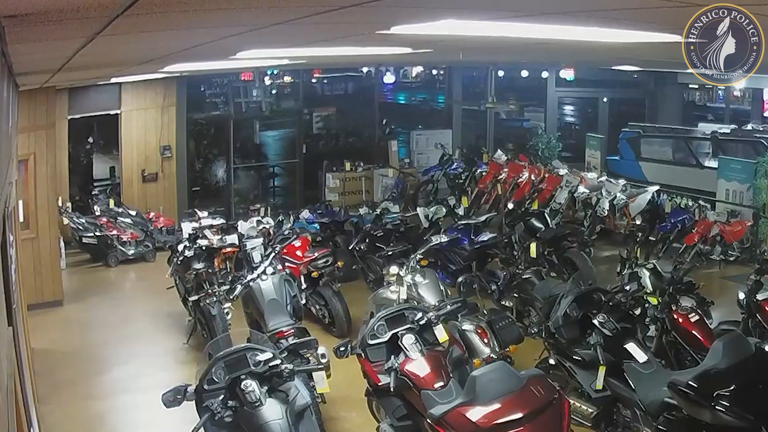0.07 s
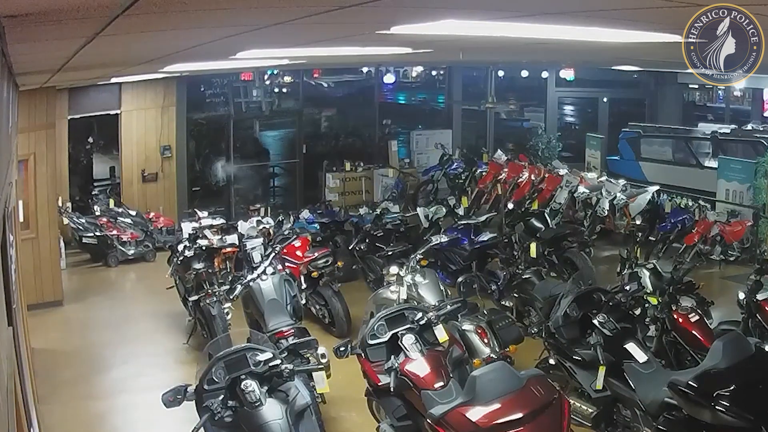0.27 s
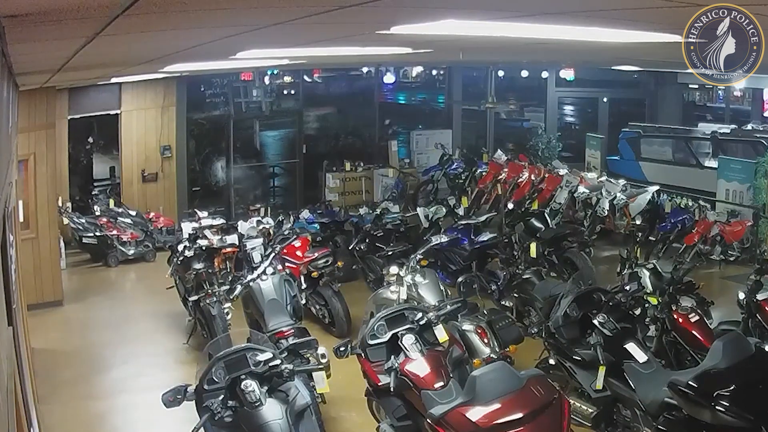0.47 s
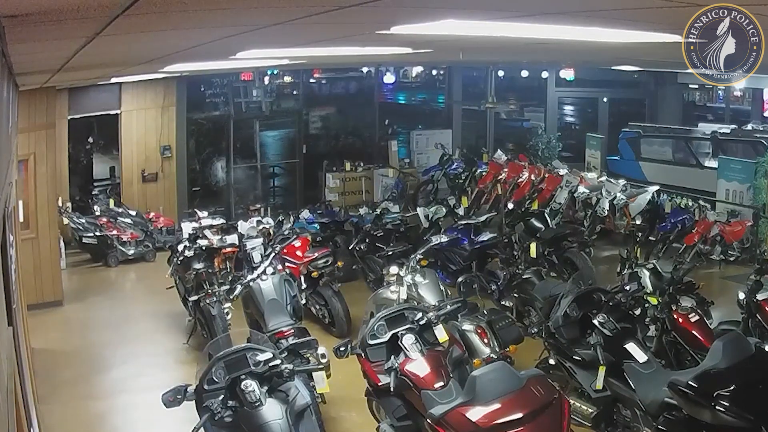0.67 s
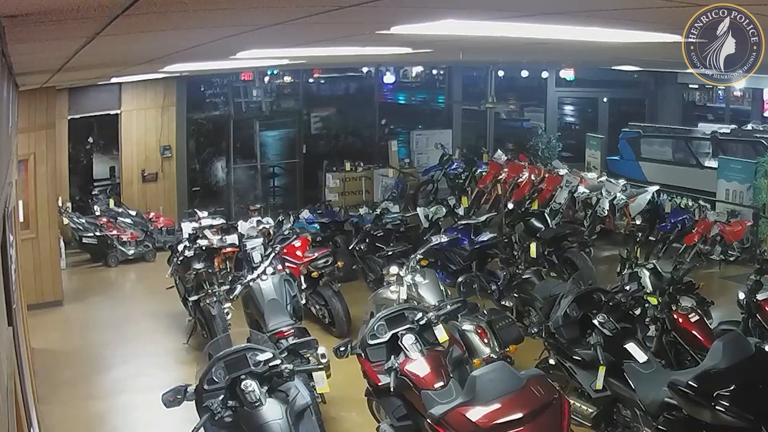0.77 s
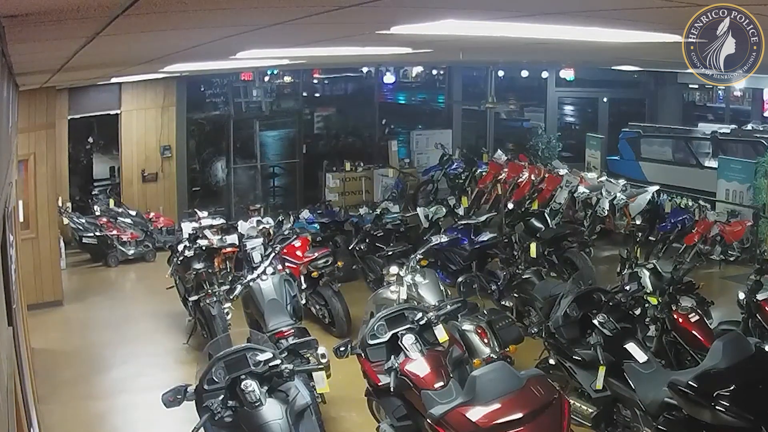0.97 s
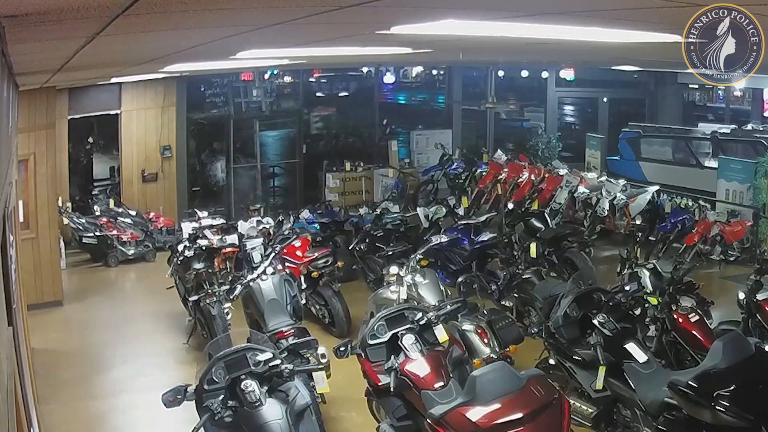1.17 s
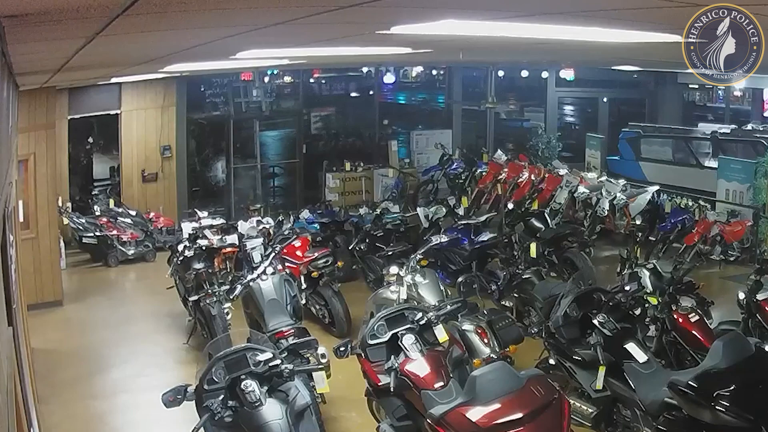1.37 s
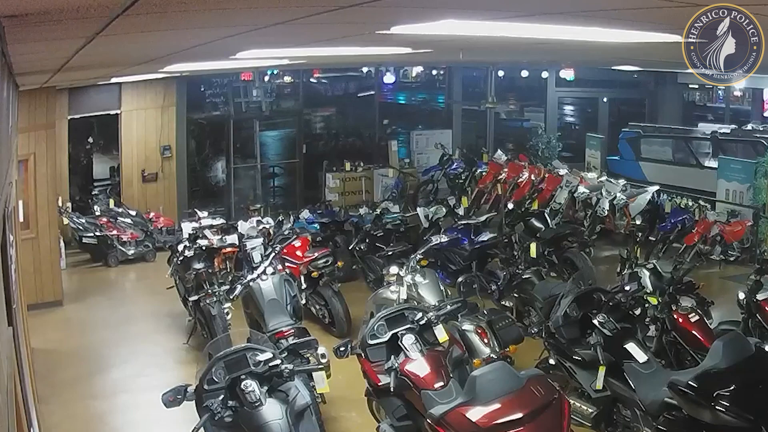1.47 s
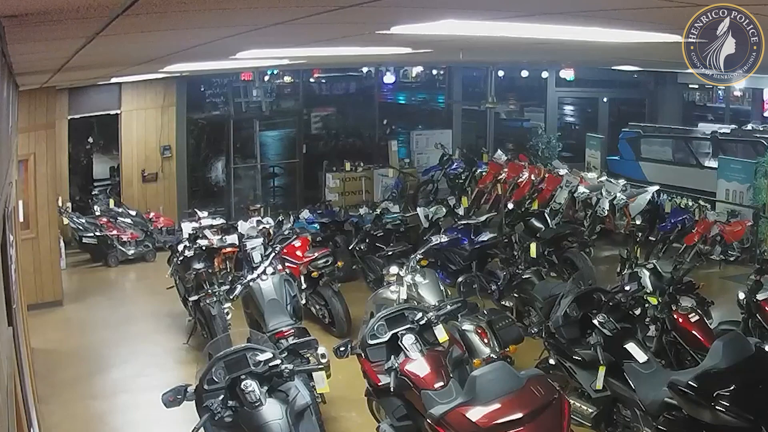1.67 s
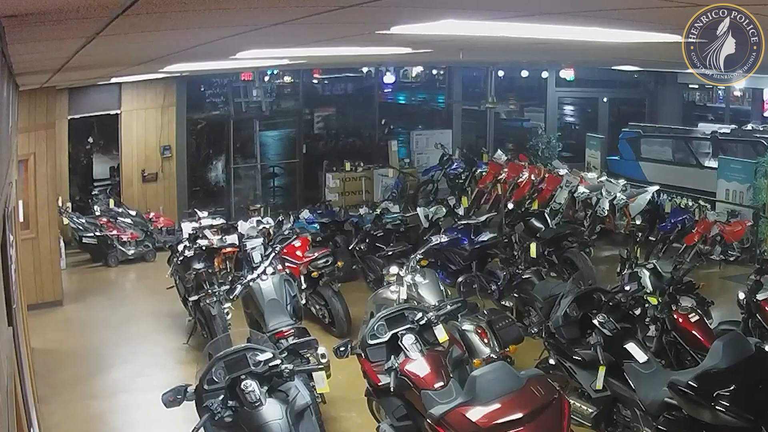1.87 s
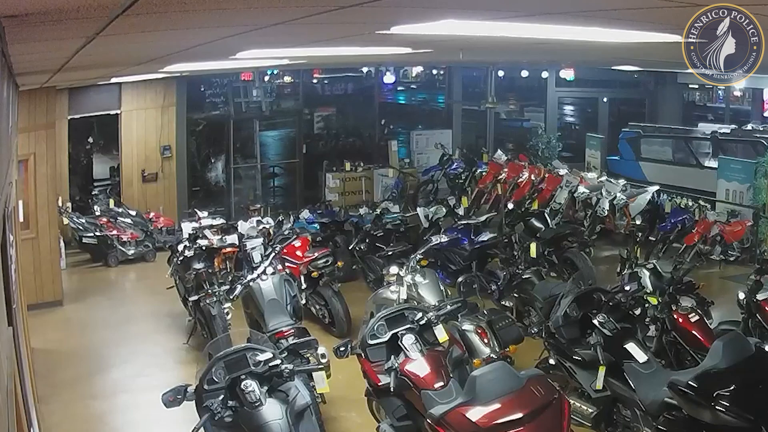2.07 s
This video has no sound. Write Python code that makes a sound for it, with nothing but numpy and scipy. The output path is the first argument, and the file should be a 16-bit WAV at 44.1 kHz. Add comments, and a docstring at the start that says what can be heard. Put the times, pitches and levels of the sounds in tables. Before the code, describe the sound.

A glass door bursts under a heavy blow, then shards tinkle down in a large showroom

```python
"""Glass door bursting in a showroom

A heavy blow bursts a glass door: the frame rings as damped modes and the pane crashes down as filtered noise.
Shards fall as random damped tones and clink on the floor, with two short low squeaks of paired gliding
tones and some dull bumps of low noise. A diffuse tail gives the large room; a small security-camera
microphone with a sharp resonance hears it from across the room and overloads on the crash."""
import sys
import numpy as np
from scipy import signal
from scipy.fft import rfft, irfft, next_fast_len
from scipy.io import wavfile
from scipy.ndimage import uniform_filter1d

SR = 44100
rng = np.random.default_rng(int(sys.argv[2]) if len(sys.argv) > 2 else 0)


def generate_wav(sig):
    """Save sig (samples, or channels by samples) to the path in sys.argv[1] as 16-bit PCM at SR."""
    pcm = np.round(np.clip(np.atleast_2d(sig).T, -1, 1) * 32767).astype(np.int16)
    wavfile.write(sys.argv[1], SR, pcm)


N = 94815
TOP_HZ = 7280  # upper band limit of the microphone, shards and room tail

# Crack and thud onsets: a soft lead-in, the heavy blows that burst the pane, then later cracks among the
# falling glass. Each row: start in seconds, crack level in dB, thud level in dB.
ONSETS = [(0.203, -11, -24.5), (.216, 4, -17.5), (.236, -1, -14.5), (0.261, -5, -15), (0.293, -8, -27.5),
          (0.323, -13.5, -13.5), (.365, -32, -22.5), (0.461, -30, -28.5), (0.576, -30, -34),
          (.96, -32.5, -81), (1.259, -40, -75.5), (1.372, -28.5, -59.5), (1.479, -32.5, -59.5),
          (1.73, -29, -60), (2.14, -29, -72)]


def amp(db):
    """Level: a decibel value becomes a pressure gain."""
    return 10 ** (np.asarray(db) / 20)


def unit(x):
    """Normalisation: scale to an rms of 1."""
    return x / np.sqrt(np.mean(x ** 2) + 1e-20)


def along(points, hz):
    """Interpolation: read (Hz, value) points on a logarithmic frequency axis."""
    f, v = np.transpose(points)
    return np.interp(np.log(hz + 1), np.log(f + 1), v)


def colour(x, points):
    """Minimum-phase filtering: folding the cepstrum makes a (Hz, dB) response causal."""
    size = 8192
    cepstrum = irfft(np.log(amp(along(points, np.fft.rfftfreq(size, 1 / SR)))))
    cepstrum[1:size // 2] *= 2
    cepstrum[size // 2 + 1:] = 0
    impulse = irfft(np.exp(rfft(cepstrum)))
    return signal.fftconvolve(x, impulse)[:len(x)]


def noise(points):
    """Spectral shaping: white noise takes on a (Hz, dB) spectrum, at rms 1."""
    return unit(colour(rng.standard_normal(N), points))


def add(track, s, sound):
    """Superposition: mix a sound into the track from time s."""
    i = max(0, round(s * SR))
    part = sound[:max(0, N - i)]
    track[i:i + len(part)] += part


def hush():
    """Stationary background noise: the quiet room hum is mostly low-frequency."""
    # Each row: frequency in Hz, level in dB.
    hush_spectrum = [(20, 10.5), (50, 15), (120, -2.5), (300, 3.5), (1000, -0.5), (3000, -44),
                     (7300, -24.5)]
    return amp(-70) * noise(hush_spectrum)


def pings(per_s, centre_hz, spread, cycles, size, count):
    """Random impacts: damped tones of scattered time, pitch, strength and life sum to rms 1."""
    size_spread_db = 3.5
    start, pitch, strength, life = rng.random(count), *rng.standard_normal((3, count))
    falling = np.arange(count) < per_s * N / SR
    t = np.arange(size) / SR
    hz = np.clip(centre_hz * np.exp(spread * pitch), 150, TOP_HZ)[:, None]
    # each tone falls 60 dB in its own number of cycles; a taper brings the end to zero
    life_cycles = cycles * np.exp(life / 2)[:, None]
    fade = amp(-60 * hz * t / life_cycles) * (1 - t / t[-1])
    gain = falling * amp(size_spread_db * np.minimum(strength, 2))
    tones = gain[:, None] * np.sin(2 * np.pi * hz * t) * fade
    at = (start * N).astype(int)[:, None] + np.arange(size)
    return unit(np.bincount(at.ravel(), tones.ravel(), minlength=N)[:N])


def shower():
    """Granular impact: many small shards ping over a grit of splinters, with heavier pieces knocking."""
    # Flow of falling glass. Each row: time in seconds, level in dB.
    flow_points = [(0, -37), (.135, -45.5), (.155, -66.5), (.205, -56), (.225, 7), (.33, -9), (.455, -9.5),
                   (.5, -26.5), (.6, -21.5), (.69, -42.5), (.85, -33.5), (0.949, -40), (1.041, -33.5),
                   (1.098, -28), (1.161, -20), (1.23, -31), (1.33, -29.5), (1.399, -25.5), (1.45, -30),
                   (1.505, -24), (1.6, -31.5), (1.65, -26.5), (1.73, -14.5), (1.82, -14.5), (1.899, -29),
                   (2.0, -58), (2.039, -28), (2.07, -21.5), (2.111, -25.5), (2.15, -14.5)]
    # Spectrum of shards and splinters. Each row: frequency in Hz, level in dB.
    glass_spectrum = [(40, -48.5), (200, -26), (450, -25.5), (750, -14.5), (1500, 0), (2500, 6),
                      (4000, 4.5), (5500, -7.5), (7300, -13)]
    grit_db, chunk_db = -7, -16.5  # relative to the shards
    shards = pings(per_s=2700, centre_hz=3200, spread=0.2917, cycles=16, size=500, count=6000)
    shards = unit(colour(shards, glass_spectrum))
    chunks = pings(per_s=340, centre_hz=1296, spread=.4, cycles=27, size=2000, count=800)
    grit = noise(glass_spectrum)
    flow = amp(np.interp(np.arange(N) / SR, *np.transpose(flow_points)))
    return flow * unit(shards + amp(grit_db) * grit + amp(chunk_db) * chunks)


def rumble():
    """Forced vibration: the shaken door leaf radiates low noise that follows a level curve."""
    # Each row: time in seconds, level in dB.
    rumble_points = [(0, -62), (.2, -45), (.24, -40), (.6, -37), (.8, -43.5), (1.0, -48), (1.33, -49.5),
                     (1.43, -35), (1.6, -44.5), (1.69, -50.5), (1.8, -48.5), (1.92, -47), (2.02, -88.5),
                     (2.15, -69.5)]
    # Each row: frequency in Hz, level in dB.
    leaf_spectrum = [(20, -2), (45, -9.5), (90, -3.5), (140, -7.5), (300, -5.5), (450, -12), (1000, -14.5),
                     (2500, -36.5)]
    level_db = np.interp(np.arange(N) / SR, *np.transpose(rumble_points))
    return amp(level_db) * noise(leaf_spectrum)


def clinks():
    """Modal impact: each larger shard lands with four short damped modes of its own."""
    # Each row: landing time in seconds, peak level in dB before the room.
    landings = [(.064, -28), (.525, -8.5), (.545, -15), (1.1356, -17), (1.1722, -14), (1.2646, -14.5),
                (1.2908, -21.5), (1.3804, -34), (1.613, -25), (1.6671, -20.5), (1.6915, -26), (1.7125, -10),
                (1.78, -9), (1.801, -3), (1.822, -13.5), (1.87, -8.5), (1.893, -13), (1.911, -29),
                (1.9644, -18), (2.0615, -22), (2.081, -18), (2.093, -16), (2.1242, -44)]
    centre_hz, spread, t60_s, attack_s = 3134, 0.092, 0.016, 0.0013
    out, t = np.zeros(N), np.arange(SR // 10) / SR
    envelope = amp(-60 * t / t60_s) * (1 - np.exp(-t / attack_s))
    for s, db in landings:
        hz = centre_hz * np.exp(spread * rng.standard_normal(size=(4, 1)))
        modes = np.sin(2 * np.pi * (hz * t + rng.random(hz.shape)))
        ring = modes.sum(axis=0) * envelope
        add(out, s, amp(db) * ring / np.abs(ring).max())
    return out


def waver():
    """Random modulation: smoothed noise makes a quick drift of rms 1."""
    return unit(uniform_filter1d(rng.standard_normal(N), size=200))


def frame_ring(t):
    """Modal decay: the loose frame rings in damped modes whose pitches waver as it rattles."""
    # Modes of frame and surroundings. Each row: frequency in Hz, level in dB, 60 dB decay time in seconds.
    frame_modes = [(267, -3, 0.14), (317.4, -2, 0.17), (537.5, 2, 0.11), (556.8, -3.5, 0.2),
                   (759, -4, 0.16), (1025, -1, .18), (1286, -5.5, 0.33), (1395, -7, 0.1)]
    rattle_hz = 35
    ring = np.zeros(len(t))
    for hz, db, t60 in frame_modes:
        cycles = np.cumsum(hz + rattle_hz * waver()[:len(t)]) / SR
        ring += amp(db - 60 * t / t60) * np.sin(2 * np.pi * (cycles + rng.random()))
    return ring


def door():
    """Impact excitation: each onset sets off a crack of noise, a thud in the leaf and a ring of the frame."""
    # Each row: frequency in Hz, level in dB.
    crack_spectrum = [(60, -16), (250, -12.5), (430, -19.5), (700, 6.5), (1400, 20.5), (2500, 3),
                      (4000, -3), (5500, 7), (7300, -2)]
    # Each row: frequency in Hz, level in dB.
    thud_spectrum = [(20, -16.5), (45, -2), (90, 0), (135, -3), (250, 1), (420, -14), (800, -17),
                     (2500, -50.5)]
    crack_t60_s, thud_t60_s, attack_s, frame_db = 0.13, 0.35, 0.0016, -6
    out, t = np.zeros(N), np.arange(SR // 2) / SR
    attack = 1 - np.exp(-t / attack_s)
    for s, crack_db, thud_db in ONSETS:
        crack = noise(crack_spectrum)[:len(t)] * amp(-60 * t / crack_t60_s)
        crack = crack + amp(frame_db) * frame_ring(t)
        thud = noise(thud_spectrum)[:len(t)] * amp(-60 * t / thud_t60_s)
        add(out, s, (amp(crack_db) * crack + amp(thud_db) * thud) * attack)
    return out


def deep_boom():
    """Light damping: the deepest boom starts with the soft lead-in and outlasts the crash."""
    # Each row: frequency in Hz, level in dB.
    sway_spectrum = [(15, 11), (45, -9.5), (70, -21.5), (120, -31.5), (400, -64)]
    start_db, t60_s = -31, 2.9
    age = np.arange(N) / SR - ONSETS[0][0]
    return (age > 0) * amp(start_db - 60 * age / t60_s) * noise(sway_spectrum)


def squeaks():
    """Frequency modulation: two rough squeaks, a lower tone dropping to rest while an upper one rises."""
    # Each row: start in seconds, length in seconds, level in dB, start of the lower tone in Hz,
    # upper tone at mid-length in Hz.
    squeak_rows = [(1.092, 0.067, -29.5, 599, 990), (1.294, .078, -25.5, 802.6, 990)]
    # Rasp under each squeak. Each row: frequency in Hz, level in dB.
    scrape_spectrum = [(200, -30.5), (400, -17), (520, 5), (720, -6), (1000, -12), (1400, -22.5),
                       (3000, -42.5)]
    rest_hz, settle_s, rise_hz_per_s = 498.8, .021, 1130
    upper_db, scrape_db = -3, -4.5  # relative to the lower tone's unit amplitude
    roughness = 0.065  # rms pitch jitter as a fraction of the rest pitch
    out = np.zeros(N)
    for s, length, db, start_hz, upper_hz in squeak_rows:
        t = np.arange(int(length * SR)) / SR
        lower = rest_hz + (start_hz - rest_hz) * np.exp(-t / settle_s)
        upper = upper_hz + rise_hz_per_s * (t - length / 2)
        drift = unit(uniform_filter1d(rng.standard_normal((2, N)), size=120))[:, :len(t)]
        hz = np.array([lower, upper]) + roughness * rest_hz * drift
        low, high = np.sin(2 * np.pi * np.cumsum(hz, axis=1) / SR)
        scrape = noise(scrape_spectrum)[:len(t)]
        swell = np.sin(np.pi * t / length)
        add(out, s, amp(db) * swell * (low + amp(upper_db) * high + amp(scrape_db) * scrape))
    return out


def showroom(x, wet_db):
    """Diffuse reverberation: the direct sound gains a noise tail with frequency-dependent decay."""
    # Each row: frequency in Hz, 60 dB decay time in seconds.
    room_decay = [(100, 0.57), (1000, 0.8), (3000, 0.92), (7000, 0.57)]
    hz, t, z = signal.stft(rng.standard_normal(SR), SR, nperseg=256)
    decay = amp(-60 * t / along(room_decay, hz)[:, None])
    in_band = (hz < TOP_HZ)[:, None]
    tail = signal.istft(z * decay * in_band, SR, nperseg=256)[1]
    tail *= np.sqrt(2 * TOP_HZ / SR) / np.linalg.norm(tail)  # mean power gain near 1 in the band
    return x + amp(wet_db) * signal.fftconvolve(x, tail)[:N]


def level_dip():
    """Amplitude modulation: the level dips briefly just before the crash."""
    start_s, end_s, depth_db = .153, .195, -10.0
    t = np.arange(N) / SR
    dip_db = np.where((t > start_s) & (t < end_s), depth_db, 0)
    return amp(uniform_filter1d(dip_db, size=400))


def scene():
    """Superposition: door, glass and squeaks reverberate over the dry rumble, boom and hush."""
    glass = showroom(shower() + clinks(), wet_db=-5.5)
    cracking = showroom(door(), wet_db=-0.5)
    squeaking = showroom(squeaks(), wet_db=-5.5)
    mix = hush() + glass + rumble() + cracking + deep_boom() + squeaking
    return (mix * level_dip())[None]


def record(dry):
    """Resonance and saturation: the microphone colours, its amplifier clips, the top is cut off."""
    # Microphone response. Each row: frequency in Hz, gain in dB.
    mic_response = [(30, -11.5), (1000, -15.5), (2000, -12), (2600, -8.5), (2930, -4.5), (3200, -1),
                    (3400, -2), (3650, -8), (4000, -11), (5000, -11.5), (7300, -16.5)]
    overload, knee = .42, 12  # clipping level and hardness of the amplifier
    x = colour(dry[0], mic_response)
    x = x / (1 + np.abs(x / overload) ** knee) ** (1 / knee)
    size = next_fast_len(N + SR // 2)
    lowpass = 1 / np.sqrt(1 + (np.fft.rfftfreq(size, 1 / SR) / TOP_HZ) ** 260)  # very steep
    return irfft(rfft(x, size) * lowpass, size)[None, :N]


dry = scene()
out = record(dry)
generate_wav(out)
```